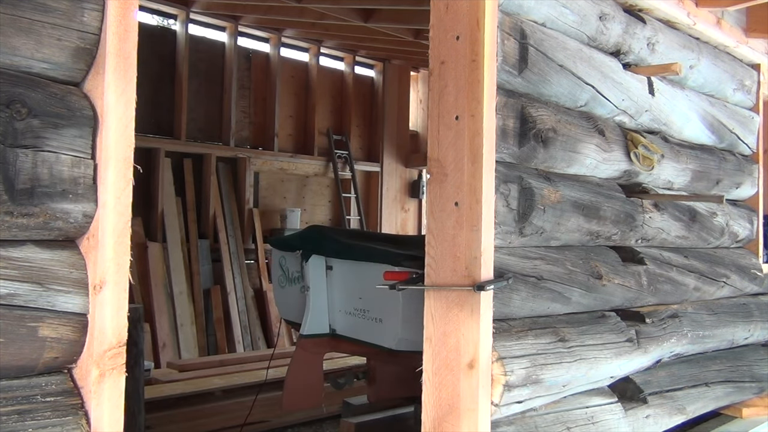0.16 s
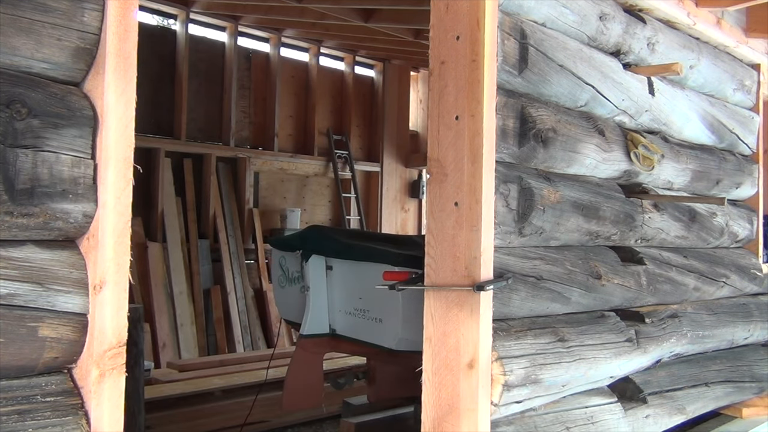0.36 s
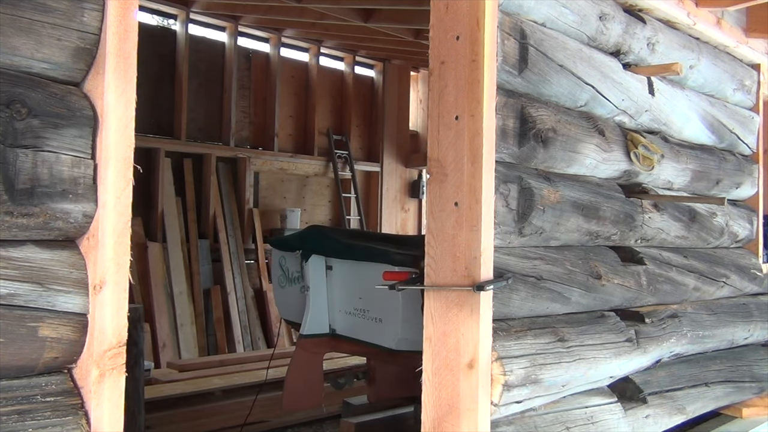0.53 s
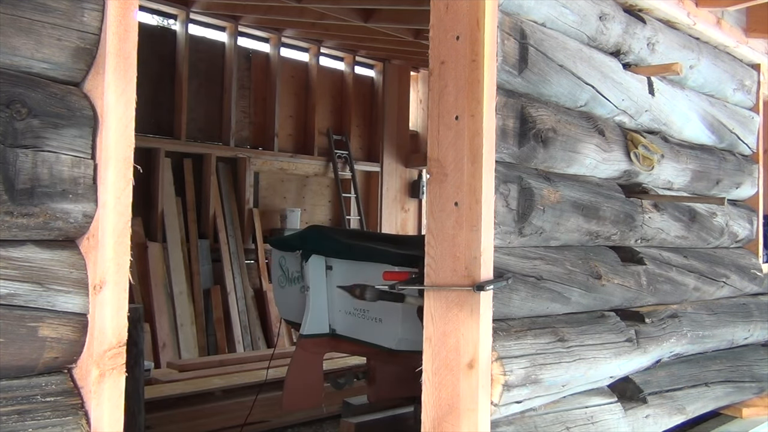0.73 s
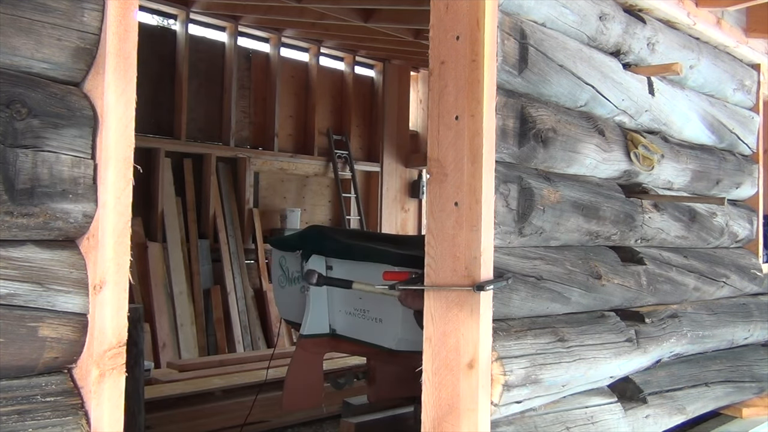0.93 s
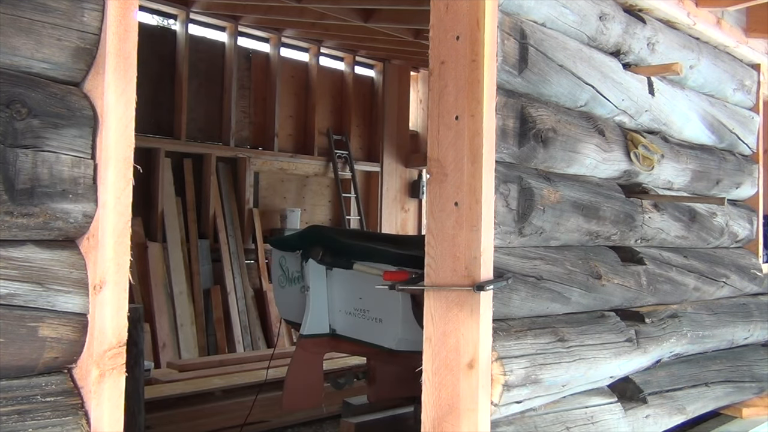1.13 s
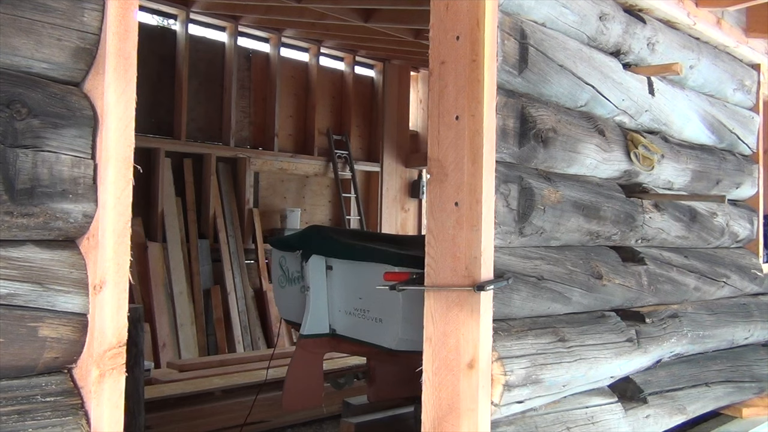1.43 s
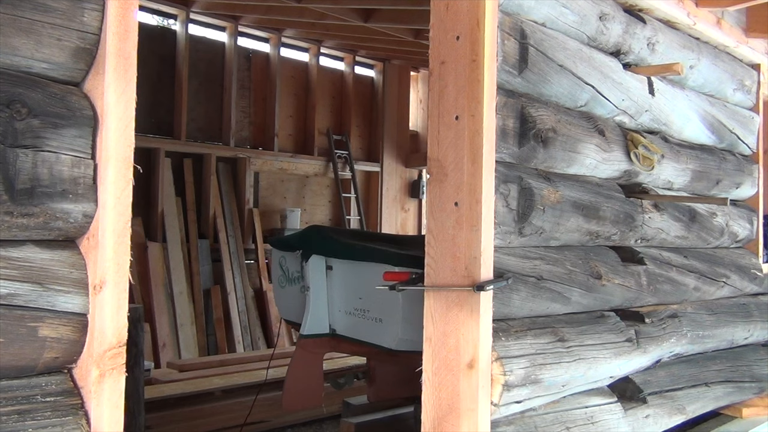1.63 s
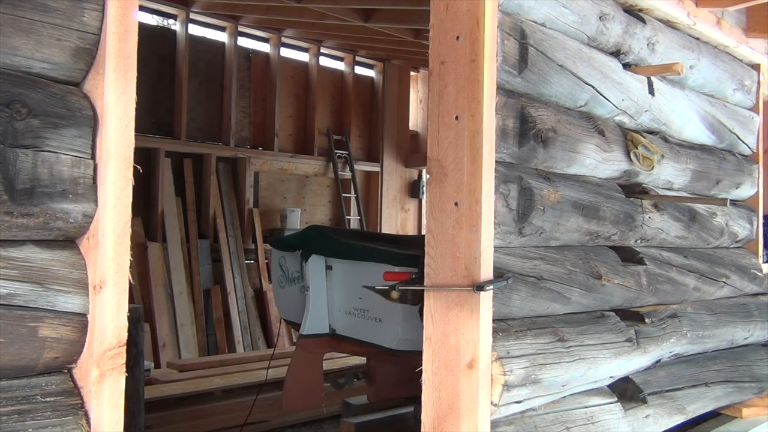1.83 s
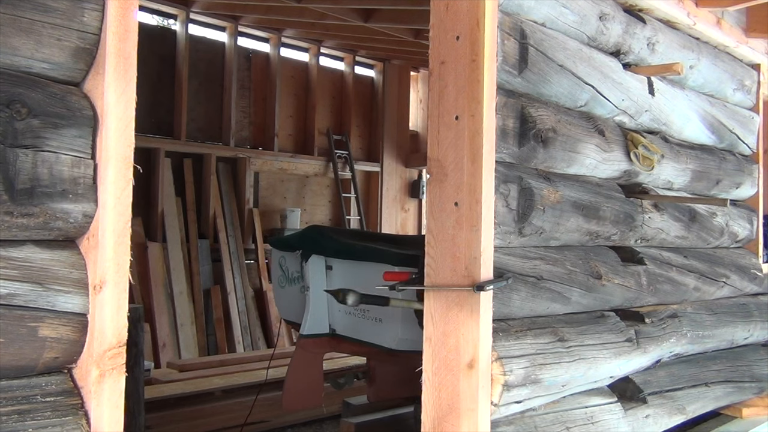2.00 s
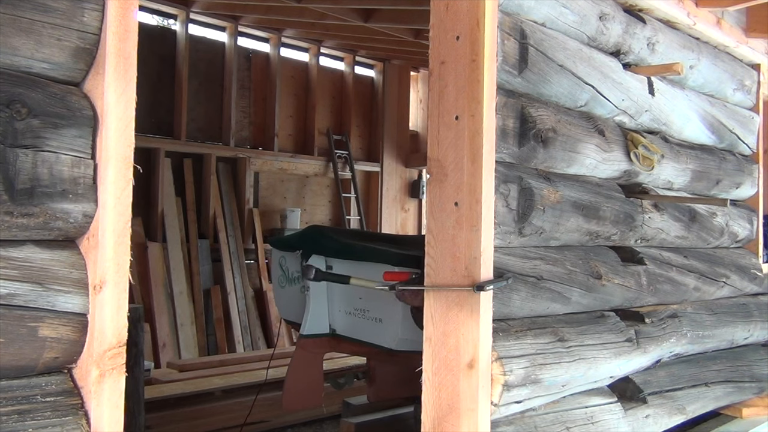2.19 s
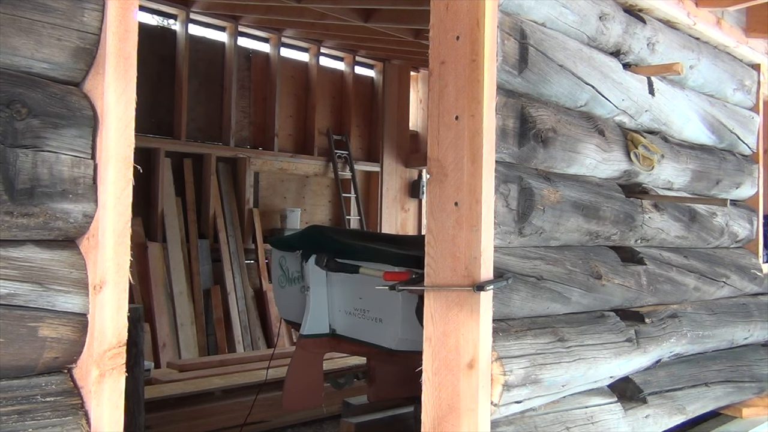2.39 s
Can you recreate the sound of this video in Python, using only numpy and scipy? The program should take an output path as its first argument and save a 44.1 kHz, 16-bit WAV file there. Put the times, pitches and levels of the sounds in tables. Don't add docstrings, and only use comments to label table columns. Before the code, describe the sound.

Two heavy hammer blows on a log wall boom through a timber shed with rattling hardware

```python
import sys
import numpy as np
from scipy import signal
from scipy.fft import rfft, irfft, next_fast_len
from scipy.io import wavfile
from scipy.ndimage import uniform_filter1d, minimum_filter1d

SR = 44100
rng = np.random.default_rng(int(sys.argv[2]) if len(sys.argv) > 2 else 0)


def inscribe(sig):
    pcm = np.round(np.clip(np.atleast_2d(sig).T, -1, 1) * 32767)
    wavfile.write(sys.argv[1], SR, pcm.astype(np.int16))


def boost(x):
    u = np.asarray(x, float) / 20
    return 10 ** u


N = 112454


def unit(x):
    return x / np.sqrt(np.mean(x ** 2) + 1e-20)


def along(points, hz):
    f, v = np.transpose(points)
    return np.interp(np.log(hz + 1), np.log(f + 1), v)


def filtered(x, response):
    m = next_fast_len(N + SR // 2)
    return irfft(rfft(x, m) * response(np.fft.rfftfreq(m, 1 / SR)), m)[..., :N]


def noise(spectrum):
    return unit(filtered(rng.standard_normal(N), lambda hz: boost(along(spectrum, hz))))


def narrow(hz, width_hz, steady=0):
    band = filtered(rng.standard_normal(N), lambda f: np.exp(-((f - hz) / width_hz) ** 2))
    z = signal.hilbert(band, next_fast_len(N))
    evened = z / (np.abs(z) + 1e-12) ** steady
    return unit(evened.real[:N])


def struck(s, db, t60_s, rise_s):
    t = np.maximum(np.arange(N) / SR - s, 0)
    return boost(db - 60 * t / t60_s) * (1 - np.exp(-t / rise_s))


def dying(s, db, spectrum, t60s, rise_s):
    hz, t, z = signal.stft(noise(spectrum), SR, nperseg=512)
    z = z * boost(-60 * np.maximum(t - s, 0) / along(t60s, hz)[:, None])
    ringing = signal.istft(z, SR, nperseg=512)[1][:N]
    return ringing * struck(s, db, np.inf, rise_s)


# (time [s], strength [dB])
BLOWS = [
    (-0.7, -13),
    (.2045, 5.5),
    (1.4675, 6),
]


def blows():
    out = np.zeros(N)
    for s, db in BLOWS:
        if s > 0:
            out += log_ring(s, db)
        out += crack(s, db) + boom(s, db) + rumble(s, db) + sway(s, db)
    return out


# (frequency [Hz], level [dB], T60 [s])
LOG_MODES = [(121.6, -1, 0.32), (148, -3.5, .3), (167.9, -1, 0.34), (235.8, -2.5, 0.3), (326, -9, 0.25),
             (422, -3.5, 0.38), (477.7, -4, 0.34), (513.8, -2, 0.34), (669, -3.5, .3), (741, -10.5, 0.34),
             (950, -8.5, 0.23), (1067, -18, 0.13)]


def log_ring(s, db):
    out = np.zeros(N)
    for hz, level_db, t60_s in LOG_MODES:
        level_db = level_db + rng.normal(0, 0.9)
        out += narrow(hz, width_hz=10.4, steady=0.82) * struck(s, level_db, t60_s, rise_s=0.0021)
    return boost(db - 9.5) * out


# (frequency [Hz], density [dB per Hz])
CRACK_SPECTRUM = [(300, -21), (600, -1), (1000, -2), (1500, -4.5), (2200, -20), (9000, -27), (11000, -21),
                  (15000, -50)]


def crack(s, db):
    return noise(CRACK_SPECTRUM) * struck(s, db - 8.5, t60_s=0.11, rise_s=0.0021)


# (frequency [Hz], density [dB per Hz])
BOOM_SPECTRUM = [(70, -30), (130, 1.5), (240, 0), (425, -2), (900, -8), (2260, -25), (11000, -30.5),
                 (14500, -37), (15800, -45)]
# (frequency [Hz], T60 [s])
BOOM_DECAY = [(60, 0.27), (150, 0.38), (500, 0.37), (1500, 0.29), (6000, 0.55), (14000, 0.33)]


def boom(s, db):
    return dying(s, db - 3.5, BOOM_SPECTRUM, BOOM_DECAY, rise_s=0.003)


# (frequency [Hz], density [dB per Hz])
RUMBLE_SPECTRUM = [(25, -7), (80, -10), (165, -5.5), (290, -3), (520, -2.5), (700, -8), (2000, -21),
                   (4500, -23.5), (9000, -51), (15800, -55)]
# (frequency [Hz], T60 [s])
RUMBLE_DECAY = [(30, 0.72), (80, 3.12), (160, 1.8), (520, 1.84), (1500, 1.85), (6000, 1.52)]


def rumble(s, db):
    return dying(s, db - 33, RUMBLE_SPECTRUM, RUMBLE_DECAY, rise_s=0.023)


# (frequency [Hz], density [dB per Hz])
SWAY_SPECTRUM = [(20, -6), (40, 3), (70, 16), (95, 12), (130, -62.5)]


def sway(s, db):
    return noise(SWAY_SPECTRUM) * struck(s, db - 23, t60_s=0.51, rise_s=0.027)


# (frequency [Hz], level [dB])
FRAME_MODES = [(153, 0.5), (232, -4.5), (346, -8.5), (432, -5.5), (468, -8), (521, 0.5)]


def frame_hum():
    hum = unit(sum(boost(level_db) * narrow(hz, width_hz=9) for hz, level_db in FRAME_MODES))
    return hum * sum(struck(s, db - 40, t60_s=2.205, rise_s=0.02) for s, db in BLOWS)


# (time [s], level [dB], T60 [s])
RATTLES = [(0.227, -9.5, .3), (0.243, -9.5, 0.29), (0.29, -12.5, 0.21), (0.336, -22, 0.28),
           (.375, -31, 0.087), (.48, -55, .3), (0.5912, -37, 0.31), (0.668, -36, 0.32), (.74, -47, 0.5),
           (0.839, -51.5, 0.19), (.8785, -60, 0.23), (1.488, -5.5, 0.27), (1.547, -11.5, 0.16),
           (1.592, -19, 0.27), (1.664, -33.5, 0.22), (1.851, -38.5, 0.67), (1.863, -39, 0.21),
           (1.94, -38.5, 0.44), (1.997, -43, 0.4), (2.11, -66, 0.1), (2.435, -69, .15)]
# (frequency [Hz], level [dB])
HARDWARE_SPECTRUM = [(250, -5), (600, -1), (1100, 2.5), (2500, -3.5), (3300, 5.5), (4800, 3), (7000, -9),
                     (10500, -17), (13000, -26), (15800, -40)]


def rattle():
    contacts_per_s, spread_db, clink_t60_s = 700, 1.5, 0.071
    chance, size = rng.random((2, N))
    contacts = (chance < contacts_per_s / SR) * boost(-2 * spread_db * np.log(size + 0.023))
    clink_power = boost(-120 * np.arange(SR // 10) / SR / clink_t60_s)
    power = signal.fftconvolve(contacts, clink_power)[:N]
    chatter = unit(np.sqrt(np.abs(power)) * noise(HARDWARE_SPECTRUM))
    burst_power = sum(struck(s, db, t60_s, rise_s=0.0027) ** 2 for s, db, t60_s in RATTLES)
    return chatter * np.sqrt(burst_power)


# (frequency [Hz], density [dB per Hz])
TAP_SPECTRUM = [(140, -44), (230, -4.5), (330, -1.5), (905, -4), (2300, -6.5), (2800, -19.5), (5070, -23),
                (10200, -42), (13000, -64)]
# (frequency [Hz], T60 [s])
TAP_DECAY = [(300, 0.3), (1500, 0.18), (8000, 0.23)]
# (frequency [Hz], level [dB], own T60 [s], not used)
KNOCK_MODES = [(323, -2.5, 0.08), (522, 1, 0.16), (888, 3.5, 0.1), (1265, -11, 0.34), (1610, -8, 0.11),
               (1920, -4, 0.12)]


def head_tap():
    tap_s, rise_s = 1.278, 0.004
    t = np.arange(N) / SR - tap_s
    knock = unit(sum(boost(db) * np.sin(2 * np.pi * hz * t) for hz, db, _ in KNOCK_MODES))
    tap = dying(tap_s, -25.5, TAP_SPECTRUM, TAP_DECAY, rise_s)
    return tap + knock * struck(tap_s, -27.5, 0.1, rise_s)


# (time [s], frequency [Hz], level [dB rms], T60 [s])
HEAD_RINGS = [
    (.73, 6540, -64, 3.5),
    (.73, 12400, -76, 4),
    (1.312, 6430, -59, 1.6),
    (1.292, 12365, -56, 1.3),
    (1.34, 2280, -67, 3),
    (1.97, 12400, -81, 2),
    (1.39, 6360, -60, 1.3),
]


def head_ring():
    return sum(narrow(hz, width_hz=91, steady=0.5) * struck(s, db, t60_s, rise_s=0.005)
               for s, hz, db, t60_s in HEAD_RINGS)


# (time [s], level [dB], T60 [s], centre [Hz], width [Hz])
CHIPS = [
    (1.0105, -40, 0.041, 6900, 6000),
    (1.014, -44.5, 0.11, 9900, 980),
    (1.025, -50, 0.16, 6800, 2900),
    (.879, -56, 0.13, 8000, 8000),
    (2.3445, -43.5, 0.024, 1600, 1400),
    (2.348, -55.5, 0.12, 1700, 2100),
    (1.4555, -42, 0.19, 830, 820),
    (1.3, -45, 0.085, 3000, 780),
    (2.225, -67, .04, 13000, 8200),
]


def chips():
    out = np.zeros(N)
    for s, db, t60_s, hz, width_hz in CHIPS:
        hiss = filtered(rng.standard_normal(N),
                        lambda f: 1j * f * width_hz / (hz * hz - f * f + 1j * f * width_hz))
        out += unit(hiss) * struck(s, db, t60_s, rise_s=0.0004)
    return out


# (frequency [Hz], density [dB per Hz])
AIR_SPECTRUM = [(25, -10), (64, -1), (200, 0), (1000, -5), (1280, -2), (1600, -7), (4000, -18),
                (8000, -16.5), (15000, -19)]


def air():
    return boost(-63.5) * noise(AIR_SPECTRUM)


def camera_whine():
    return boost(-85) * narrow(15738, width_hz=46)


# (frequency [Hz], lead [rad])
PORT_LEAD = [(30, -.55), (90, -.5), (170, -.65), (350, -.9), (700, -.95), (1400, -.75), (2800, -.45),
             (6500, -.4), (9000, -.2)]
# (frequency [Hz], level [dB])
PORT_TILT = [(40, 0), (90, -.8), (350, -1.4), (1400, -1), (2800, -2), (5600, -1.4), (12000, 0)]
# (frequency [Hz], level [dB])
PORT_APART = [(40, -24), (100, -24), (400, -22), (1400, -16), (5600, -12), (10000, -14), (14000, -9)]


def ports(mono):
    side = np.array([[1], [-1]])
    scatter_t60_s = 0.074
    scatter = rng.standard_normal(SR // 20) * boost(-60 * np.arange(SR // 20) / SR / scatter_t60_s)
    apart = signal.fftconvolve(mono, scatter / np.linalg.norm(scatter))[:N]
    shared = filtered(mono, lambda hz: boost(side * along(PORT_TILT, hz) / 2)
                      * np.exp(0.5j * side * along(PORT_LEAD, hz)))
    return shared + side * filtered(apart, lambda hz: boost(along(PORT_APART, hz)))


def scene():
    wall = blows() + frame_hum()
    steel = rattle() + head_tap() + head_ring()
    return ports(wall + steel + chips() + air() + camera_whine())


def top_cut(x):
    return signal.sosfilt(signal.butter(12, 16340, fs=SR, output="sos"), x)


def record(dry):
    ceiling_db, top_hz = -13.5, 15900
    hold, ahead, smooth = (round(s * SR) for s in (0.0088, 0.001, 0.0076))
    needed = np.minimum(1, boost(ceiling_db) / (np.abs(dry.mean(0)) + 1e-9))
    lowest = minimum_filter1d(needed, size=hold, origin=hold // 2 - ahead)
    held = uniform_filter1d(lowest, size=2 * ahead)
    released = uniform_filter1d(held, size=smooth, origin=(smooth - 1) // 2)
    gain = np.minimum(held, released)
    mix = filtered(dry * gain, lambda hz: hz < top_hz)
    return top_cut(mix)


dry = scene()
out = record(dry)
inscribe(out)
```